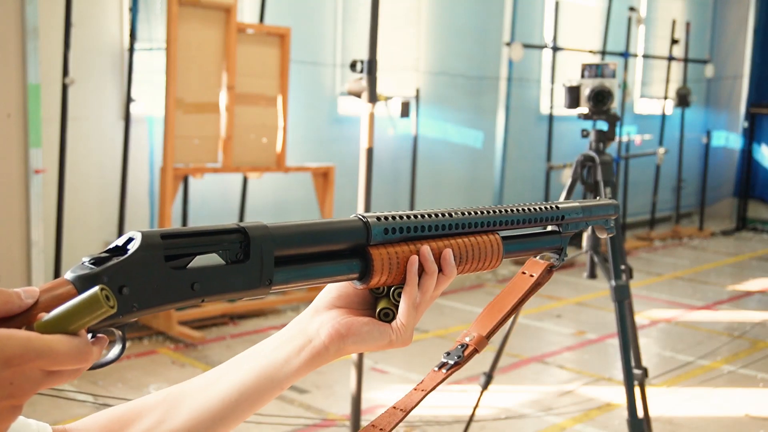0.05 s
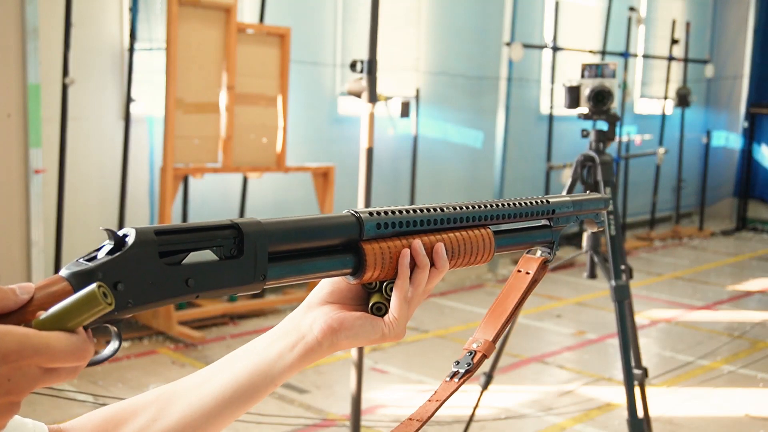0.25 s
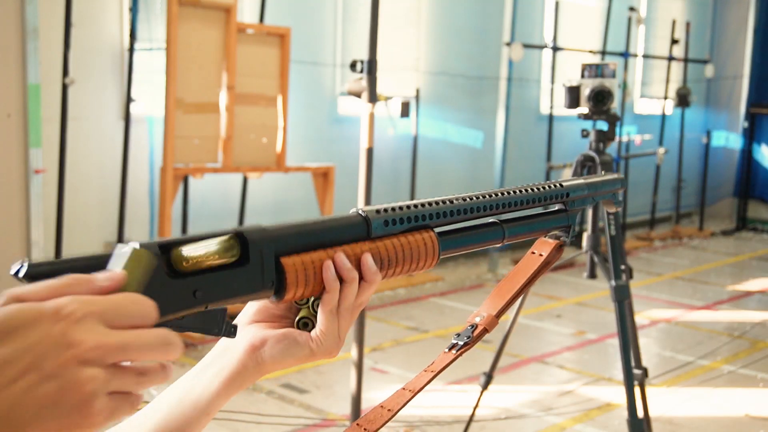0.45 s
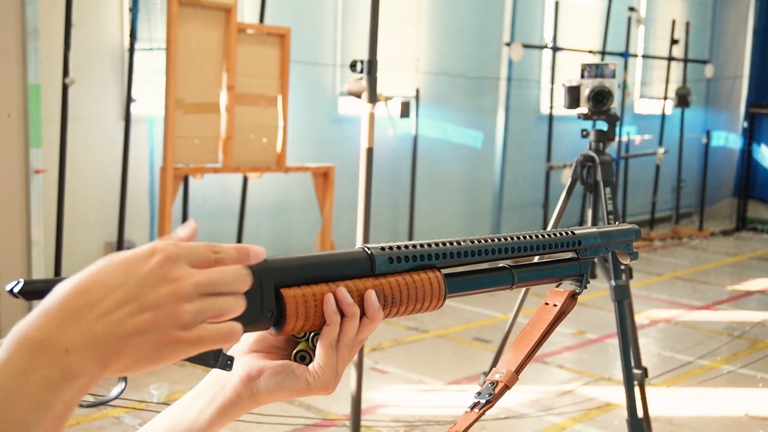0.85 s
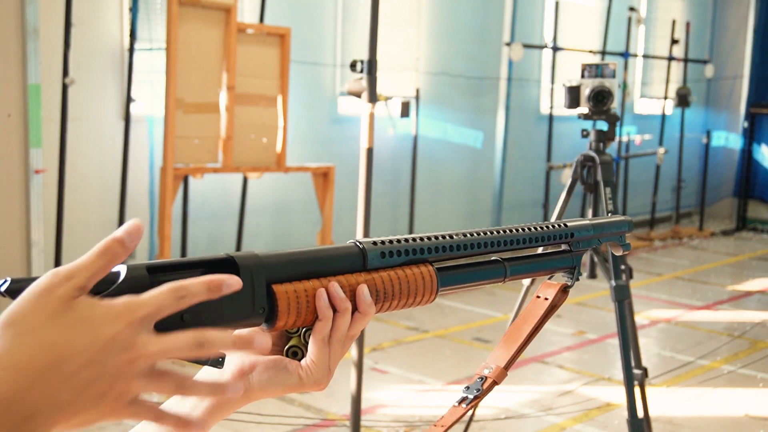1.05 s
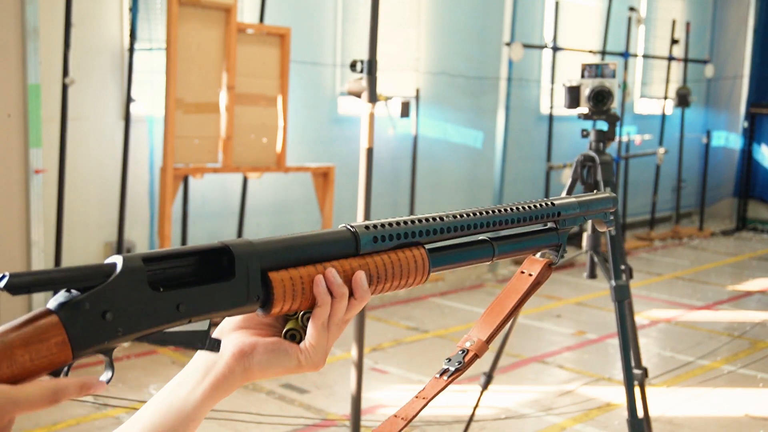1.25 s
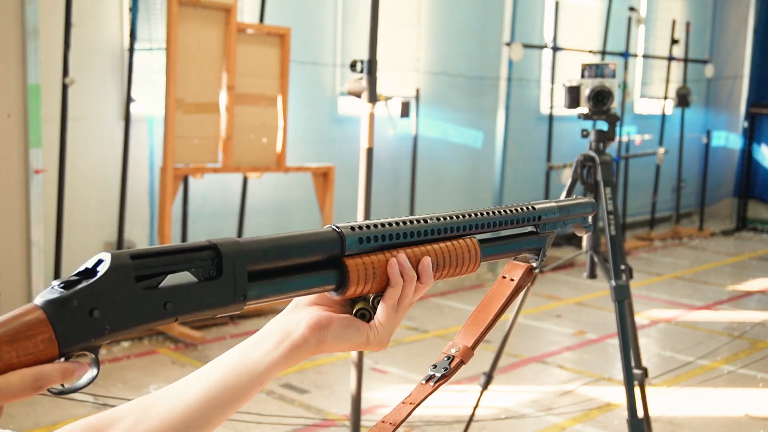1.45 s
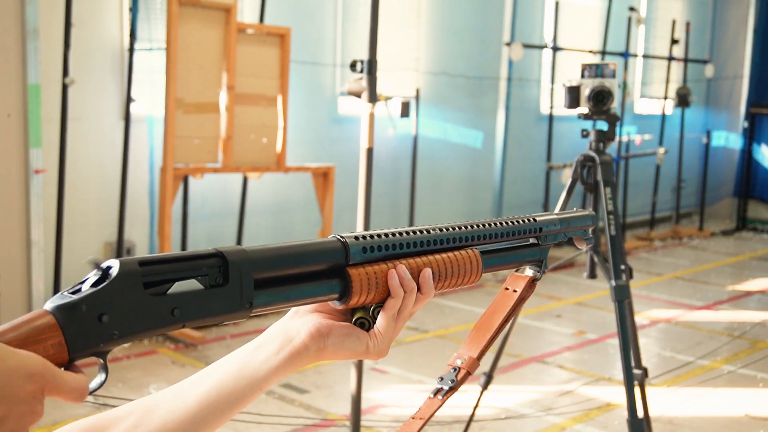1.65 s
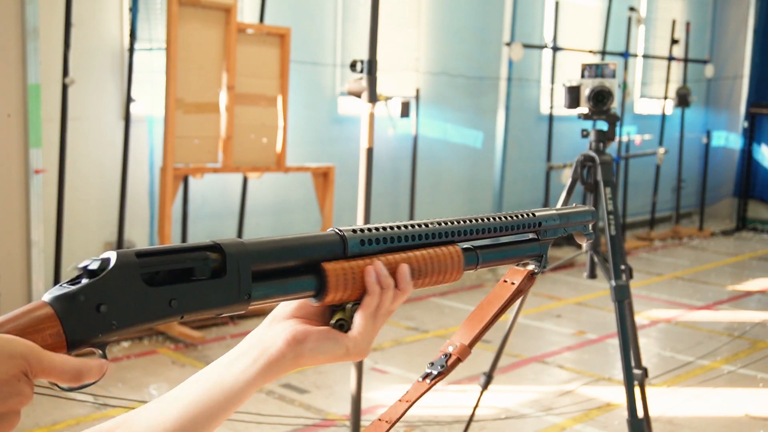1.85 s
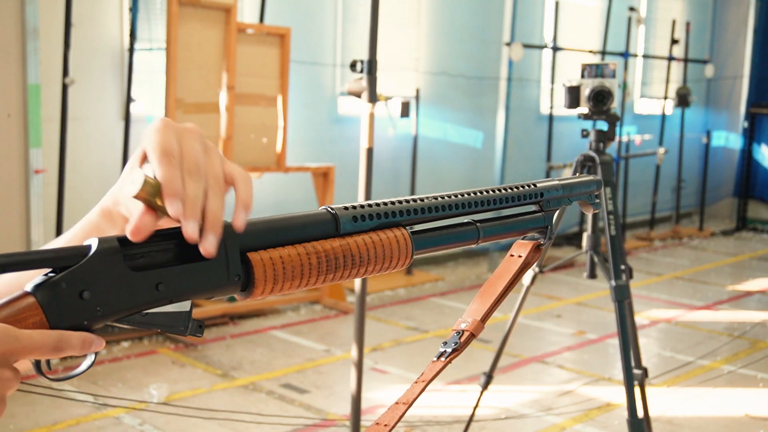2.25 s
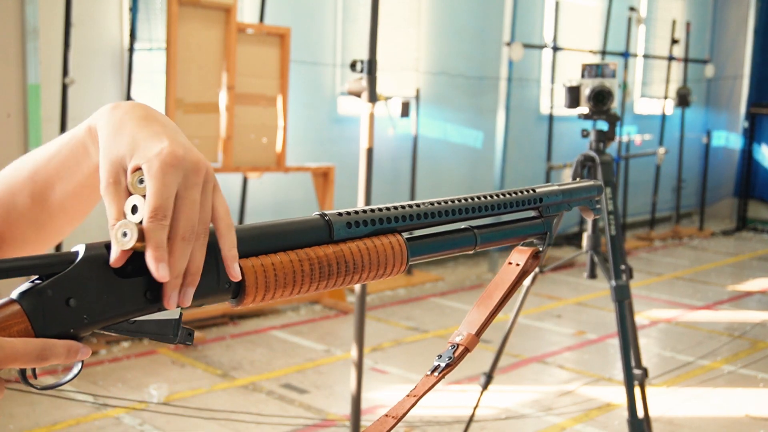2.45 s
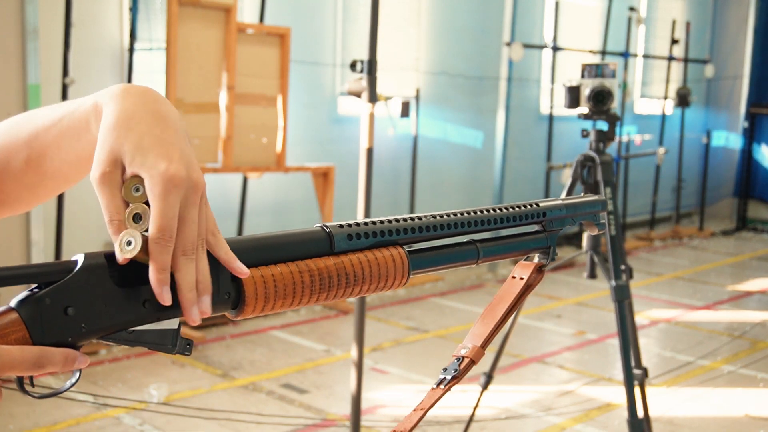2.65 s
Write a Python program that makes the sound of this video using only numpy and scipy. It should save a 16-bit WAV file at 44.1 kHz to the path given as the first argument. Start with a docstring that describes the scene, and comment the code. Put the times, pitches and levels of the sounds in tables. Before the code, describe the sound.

A pump-action shotgun is racked open close by, a shell clinks into the chamber, then the action slams shut and is racked open again. Each sharp steel clack echoes through a large hall over a faint ventilation hum.

```python
"""A pump-action replica shotgun is racked open, loaded with a shell, closed and racked again, and a hand
lands on the receiver. Each steel contact is a noise crack plus a short metal ring; sliding parts
rattle, and hand, stock and fore-end add dull thuds. Every big clack drives a fast limiter, so the echo
of the sports hall swells up behind it. Ventilation hums underneath."""
import sys
import numpy as np
from scipy import signal
from scipy.fft import rfft, irfft, next_fast_len
from scipy.io import wavfile
from scipy.ndimage import uniform_filter1d, minimum_filter1d

SR = 44100
rng = np.random.default_rng(int(sys.argv[2]) if len(sys.argv) > 2 else 0)


def put_to_file(sound):
    """Save the sound as 16-bit audio at rate SR, in the file named by the first command-line argument."""
    columns = np.atleast_2d(sound).T  # one column per channel
    safe = np.clip(columns, -1, 1)
    whole_steps = np.round(safe * 32767)
    wavfile.write(sys.argv[1], SR, whole_steps.astype(np.int16))


N = 123479

# Air rush of the vents. Each row: frequency in Hz, spectral level in dB.
VENT_SPECTRUM = [(20, -23), (50, -17.5), (100, -2.5), (130, -6), (190, 5.5), (260, -5), (480, -10.5),
                 (700, -13.5), (1200, -11), (2000, -16), (3600, -25), (5600, -21), (8000, -37.5),
                 (15000, -45)]
# Decay of the hall. Each row: frequency in Hz, T60 in seconds.
HALL_DECAY = [(150, 0.88), (550, 0.79), (1500, 0.73), (3700, 0.71), (7000, 0.53), (10000, 0.46),
              (15000, 0.34)]
# Tone of the echo. Each row: frequency in Hz, gain in dB.
HALL_EQ = [(100, -10), (400, -7.5), (1000, -7), (2000, -5), (4000, -3), (8000, -4), (15000, -2)]
# Stereo width of the hall and of the gun. Each row: frequency in Hz, side over mid in dB.
HALL_WIDTH = [(60, -50), (380, -17), (950, -15.5), (2400, -10.5), (6000, -6.5), (15000, 0)]
GUN_WIDTH = [(200, -20), (1500, -22.5), (5000, -7.5), (14000, -3)]
# Knocks of hand, stock and fore-end. Each row: start in seconds, level in dB, centre in Hz.
THUD_HITS = [(0.214, -32, 252), (0.244, -15, 237), (.2495, -17, 207), (.497, -8, 614), (.519, -11.5, 500),
             (0.976, -23, 193), (.9845, -22, 344), (1.315, -22.5, 766), (1.467, -13.5, 375),
             (1.491, -21, 303), (1.723, -15.5, 288), (1.9072, -21, 1030), (1.998, -5, 930),
             (2.027, -10.5, 840), (2.364, -24, 1000), (2.493, -28, 169), (2.503, -27.5, 225),
             (2.532, -31.5, 286)]
# Tone of a thud. Each row: multiple of its centre, spectral level in dB.
THUD_SPECTRUM = [(.15, -24.5), (.5, -3.5), (1, 4), (1.6, 1.5), (3, -3.5), (10, -61)]
# Travel of the sliding parts. Each row: start in seconds, length in seconds, relative rattle in dB.
SLIDE_STROKES = [(.393, .125, 0), (.921, .058, -13), (1.359, .132, -1), (1.886, .148, -1)]
# Small steel parts being struck. Each row: start in seconds, level in dB, pitch in Hz.
PING_HITS = [(.3915, -7, 2910), (.461, -1.5, 2600), (.9305, -11.5, 3520), (1.0168, -11, 4425),
             (1.372, -3, 4370), (1.466, 4, 4120), (1.491, 2, 3710), (1.883, -4.5, 3810), (1.997, -4, 3950)]
# Ring of a small part. Each row: multiple of its pitch, level in dB, T60 in seconds.
PING_MODES = [(.94, -5, .014), (1, 0, .022), (1.07, -6, .014)]
# The shell knocks into the chamber and clinks on steel. Each row: start in seconds, level in dB.
KNOCK_HITS = [(0.9185, -15), (0.9335, -15.5)]
CLINK_HITS = [(0.9198, -14), (0.9306, -27), (0.9403, -6.5), (1.0242, -15), (2.5033, -14), (2.5115, -25)]
# Tone of a shell clink and of a steel crack. Each row: frequency in Hz, spectral level in dB.
CLINK_SPECTRUM = [(300, -47), (2500, -14), (3200, -4), (4200, -10), (5550, 3), (6700, -1), (8100, -1),
                  (9500, -17), (13300, -16), (15000, -36)]
CRACK_SPECTRUM = [(30, -90), (120, -34), (400, -30), (800, -12), (1150, -9), (1600, 0), (2400, 0.5),
                  (3100, 0.5), (3900, 1.5), (5000, -0.5), (7500, -5), (10000, -11.5), (13400, -17),
                  (15500, -26)]
# Ring of the hollow shell and the gun's parts. Each row: frequency in Hz, level in dB, T60 in seconds.
SHELL_MODES = [(690, 1, .03), (1090, 1, .022), (3575, -8, .1), (5313, -6, .18)]
CATCH_MODES = [(1350, -2, .018), (2170, 2, .016), (2880, 0, .018), (3650, 0, .018), (4400, -4, .011)]
LATCH_MODES = [(1600, -8, .018), (2150, -5, .018), (2440, -2, .022), (3890, 2, .028), (4100, -4, .016),
               (4520, -7, .014), (12300, -15, .006)]
RECEIVER_MODES = [(705, -20, .02), (1120, -16, .014), (1340, -9, .026), (1460, -5, .03), (1555, -1, .038),
                  (1645, 0, .038), (1775, -5, .026), (1970, -9, .02), (2550, -14, .018)]
# The receiver's ring shifts as the bolt slides. Each row: time in seconds, pitch factor.
RECEIVER_PITCH = [(.41, 1.15), (.462, .88), (.495, 1.01), (.512, 1.1), (.52, .95), (.92, 1.08), (.985, .98),
                  (1.36, 1.05), (1.96, 1.05), (1.996, 1.2), (2.026, 1.13)]
# Metal contacts. Each row: start in seconds, crack in dB, relative ring in dB, crack tilt in dB/octave.
CLACK_HITS = [ (0.211, -23, -27, -3.5), (0.217, -22, -37, -7.5), (0.2442, -14.5, -27, 3),
              (0.2493, 8, 0, -1), (0.392, -2.5, -6, -1), (0.4, -2.5, -15, -2), (.414, 7.5, 7.5, -1),
              (0.445, -21, -13, 3), (0.4602, -3.5, 7.5, -2), (.468, -10, 1.5, -4), (0.486, -9, -17, -8),
              (.495, 12.5, 13, -1.5), (0.512, -0.5, 5, -7), (.519, -4.5, 4, -7), (.825, -15.5, -35, -4.5),
              (0.9117, -26, -15, 0), (0.9185, -17, 3.5, -16), (0.933, -12.5, -0.5, -6.5),
              (.9402, -17, 0, 4), (0.963, -24, -16, -20), (0.9742, -30, -9, 5), (.984, 4, 10.5, -1.5),
              (1.0166, -2, -8, 1), (1.023, -8.5, -20, 7.5), (1.163, -31, -25, -4), (1.2176, -23, -17, -1),
              (1.311, -12, -11, -2), (1.3141, -6, -1.5, -1.5), (1.353, -9.5, -12.5, -0.5),
              (1.359, -4.5, -1.5, 1), (1.372, 3, -2, 3), (1.379, 4.5, -17, -6), (1.385, 1, 3, -0.5),
              (1.405, -2, 5, 4), (1.421, 5, 1, -2.5), (1.439, 0.5, 3, -9), (1.465, 4.5, -20, -4),
              (1.479, -4.5, -24, -1), (1.491, 16.5, -11, 1.5), (1.71, -9, -3.5, -0.5), (1.723, 9, 3, -1),
              (1.8832, 0.5, 1.5, 0), (1.8884, -14, -6, -9), (1.906, 7, 1, 0), (1.91, -9, 7, -10),
              (1.914, 1, 3.5, -3), (1.942, -7, -10, -0.5), (1.959, 9.5, 7, -2), (1.966, -13, -9, -2),
              (1.996, 9.5, 11, -1.5), (2.026, -2.5, 5, 2), (2.363, -15, -12.5, 1.5), (2.49, -20, -50, -4.5),
              (2.5035, -19.5, -31, 3.5), (2.559, -37, -24.5, -4)]

HIT_TIME = np.arange(SR // 7) / SR  # seconds since a hit


def amp(db):
    return 10 ** (np.asarray(db) / 20)


def unit_rms(x):
    return x / np.sqrt(np.mean(x ** 2) + 1e-20)


def decay(t, t60):
    return np.exp(-np.log(1000) * t / t60)


def match_energy(x, envelope):
    return x * np.linalg.norm(envelope) / np.linalg.norm(x)


def mix_in(track, start_s, x):
    part = track[max(round(start_s * SR), 0):][:len(x)]
    part += x[:len(part)]


def curve_at(points, hz):
    """Read a curve on a log frequency axis."""
    point_hz, values = np.transpose(points)
    return np.interp(np.log(hz + 1), np.log(point_hz + 1), values)


def filtered(x, response):
    """Zero-phase EQ; response maps Hz to gain."""
    n = x.shape[-1]
    size = next_fast_len(n + SR // 10)
    return irfft(rfft(x, size) * response(np.fft.rfftfreq(size, 1 / SR)), size)[..., :n]


def coloured(x, spectrum, tilt_db=0, size=2048):
    """Minimum-phase EQ at unit power gain, tilted by tilt_db per octave above 1 kHz."""
    hz = np.fft.rfftfreq(size, 1 / SR)
    octaves = np.log2(np.maximum(hz, 1000) / 1000)
    gain = unit_rms(amp(curve_at(spectrum, hz) + tilt_db * octaves))
    cepstrum = irfft(np.log(gain + 1e-6))
    cepstrum[1:size // 2] *= 2
    cepstrum[size // 2 + 1:] = 0
    impulse = irfft(np.exp(rfft(cepstrum)))
    return signal.fftconvolve(x, impulse)[:len(x)]


def stereo(mid, side, width):
    side = filtered(side, lambda hz: amp(curve_at(width, hz)))
    return np.array([mid + side, mid - side])


def noise_hit(envelope, spectrum, tilt_db=0):
    """A noise burst, evened out so that no chance tone sticks out, then coloured."""
    x = envelope * rng.standard_normal(len(envelope))
    for _ in range(3):
        bins = rfft(x)
        x = irfft(bins / (np.abs(bins) + 1e-12), len(envelope))
        x *= envelope / np.sqrt(np.abs(uniform_filter1d(x * x, size=40)) + 1e-14)
    return match_energy(coloured(x, spectrum, tilt_db), envelope)


def ring_hit(envelope, modes, pitch=1, rise_s=0.00042):
    """Damped modes with the envelope's energy, struck a little differently each time."""
    hz, db, t60 = np.transpose(modes)[:, :, None]
    level, detune, phase = rng.standard_normal((3, len(hz), 1))
    cycles = hz * pitch * (1 + 0.0047 * detune) * HIT_TIME + phase
    partials = amp(db + 2 * level) * decay(HIT_TIME, t60) * np.sin(2 * np.pi * cycles)
    attack = 1 - np.exp(-HIT_TIME / rise_s)
    return match_energy(partials.sum(0) * attack, envelope)


def ventilation(rush_db=-42, hum_db=-66, hum_hz=191, half_width_hz=18):
    """The bed: a steady rush of air with a fuzzy low hum."""
    rush = filtered(rng.standard_normal((2, N)), lambda hz: amp(curve_at(VENT_SPECTRUM, hz)))
    hum = filtered(rng.standard_normal(N), lambda hz: 1 / (1 + ((hz - hum_hz) / half_width_hz) ** 2))
    return amp(rush_db) * stereo(*unit_rms(rush), HALL_WIDTH) + amp(hum_db) * unit_rms(hum)


def hall_echo(gun, predelay_s=0.0043, build_s=0.0069, tail_count=28):
    """A diffuse tail that builds up, dies faster in the treble and changes as the gun moves."""
    out, t = np.zeros((2, N)), np.arange(SR) / SR
    build = 1 - np.exp(-np.maximum(t - predelay_s, 0) / build_s)
    mean_t60 = np.mean(HALL_DECAY, axis=0)[1]
    for stretch in np.array_split(np.arange(N), tail_count):  # a fresh tail for each stretch
        hz, frame_s, noise = signal.stft(rng.standard_normal((2, SR)), SR, nperseg=256)
        damped = noise * decay(frame_s, curve_at(HALL_DECAY, hz)[:, None])
        tail = build * signal.istft(damped, SR)[1][:, :SR]
        tail /= np.linalg.norm(build * decay(t, mean_t60))
        for channel, impulse in zip(out, tail):
            mix_in(channel, stretch[0] / SR, signal.fftconvolve(gun[stretch], impulse))
    mid, side = filtered(out, lambda hz: amp(curve_at(HALL_EQ, hz)))
    return stereo(mid, side, HALL_WIDTH)


def thuds(t60_s=0.037):
    """The weight: dull, quickly damped knocks of hand, stock and fore-end."""
    out, envelope = np.zeros(N), decay(HIT_TIME, t60_s)
    for start, db, centre_hz in THUD_HITS:
        spectrum = np.array(THUD_SPECTRUM) * [centre_hz, 1]
        mix_in(out, start, amp(db) * noise_hit(envelope, spectrum))
    return out


def slide_rattle(ticks_per_s=500, spread_db=3, level_db=-10):
    """The sliding bolt and fore-end chatter in irregular ticks that swell through each stroke."""
    out, t = np.zeros(N), np.arange(SR // 50) / SR
    ticks = (rng.random(N) < ticks_per_s / SR) * amp(spread_db * rng.standard_normal(N))
    chatter = signal.fftconvolve(ticks, decay(t, t60=0.023))[:N] * rng.standard_normal(N)
    for start, length, db in SLIDE_STROKES:
        stroke = unit_rms(chatter[round(start * SR):round((start + length) * SR)])
        swell = np.linspace(0.5, 1.3, len(stroke))
        mix_in(out, start, amp(level_db + db) * stroke * swell)
    return coloured(out, CRACK_SPECTRUM, tilt_db=-0.5)


def contact_envelope(rise_s=0.00077, crack_t60_s=0.012, shiver_db=-8.5, shiver_t60_s=0.089):
    """A hard crack, then a shiver as loose parts buzz on."""
    shiver = amp(shiver_db) * decay(HIT_TIME, shiver_t60_s)
    return (decay(HIT_TIME, crack_t60_s) + shiver) * (1 - np.exp(-HIT_TIME / rise_s))


def shell(envelope):
    """The hollow shell rings as it knocks into the chamber; its case clinks against the steel."""
    out = np.zeros(N)
    for start, db in KNOCK_HITS:
        mix_in(out, start, amp(db) * ring_hit(envelope, SHELL_MODES))
    for start, db in CLINK_HITS:
        mix_in(out, start, amp(db) * noise_hit(envelope, CLINK_SPECTRUM))
    return out


def small_parts(envelope, catch_s=0.2493, catch_db=6.5, latch_s=1.7235, latch_db=5):
    """Struck steel pings; the catch lets go before the first stroke, the latch snaps home on closing."""
    out = np.zeros(N)
    for start, db, hz in PING_HITS:
        mix_in(out, start, amp(db) * ring_hit(envelope, PING_MODES, hz))
    mix_in(out, catch_s, amp(catch_db) * ring_hit(envelope, CATCH_MODES))
    mix_in(out, latch_s, amp(latch_db) * ring_hit(envelope, LATCH_MODES))
    return out


def clacks(envelope, colour_spread_db=3.5, ring_trim_db=-5.5):
    """Steel hits steel: each point of contact cracks in its own colour and rings the receiver."""
    out = np.zeros(N)
    hz, db = np.transpose(CRACK_SPECTRUM)
    for start, crack_db, ring_db, tilt_db in CLACK_HITS:
        colour = np.column_stack([hz, db + colour_spread_db * rng.standard_normal(len(hz))])
        crack = noise_hit(envelope, colour, tilt_db)
        pitch = np.interp(start, *np.transpose(RECEIVER_PITCH))
        ring = ring_hit(envelope, RECEIVER_MODES, pitch)
        mix_in(out, start, amp(crack_db) * crack + amp(ring_db + ring_trim_db) * ring)
    return out


def scene(lean_left_db=0.34):
    """The gun up close, nearly centred and a little spread in the treble, in the humming hall."""
    envelope = contact_envelope()
    gun = clacks(envelope) + small_parts(envelope) + shell(envelope) + slide_rattle() + thuds()
    scatter = rng.standard_normal(SR // 400)  # a short smear makes the side signal
    side = signal.fftconvolve(gun, scatter / np.linalg.norm(scatter))[:N]
    mix = stereo(gun, side, GUN_WIDTH) + hall_echo(gun) + ventilation()
    return mix * amp([[lean_left_db], [-lean_left_db]])


def record(dry, threshold_db=-2, attack_s=0.00038, release_s=0.034, peak_stop=0.98, lowpass_hz=15780):
    """A fast limiter ducks everything at each big clack and recovers; a peak stop catches the rest."""
    t, lag = np.arange(N) / SR, np.exp(-1 / (attack_s * SR))
    peak_db = 20 * np.log10(np.abs(dry).max(0) + 1e-9)
    over_db = np.maximum(peak_db - threshold_db, 1e-9)
    # each overshoot is caught, then let go exponentially
    held_db = np.exp(np.maximum.accumulate(np.log(over_db) + t / release_s) - t / release_s)
    duck_db = signal.lfilter([1 - lag], [1, -lag], held_db)
    ducked = dry * amp(-duck_db)
    stop_gain = np.minimum(1, peak_stop / (np.abs(ducked).max(0) + 1e-9))
    smooth_gain = uniform_filter1d(minimum_filter1d(stop_gain, size=41), size=41)
    return filtered(ducked * smooth_gain, lambda hz: hz < lowpass_hz)


dry = scene()
out = record(dry)
put_to_file(out)
```